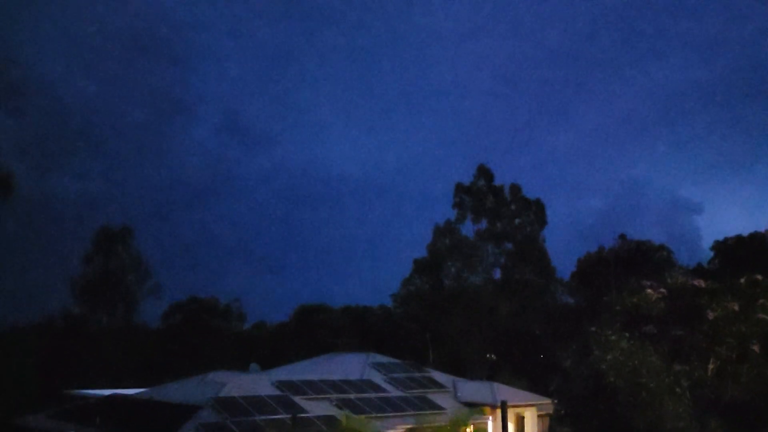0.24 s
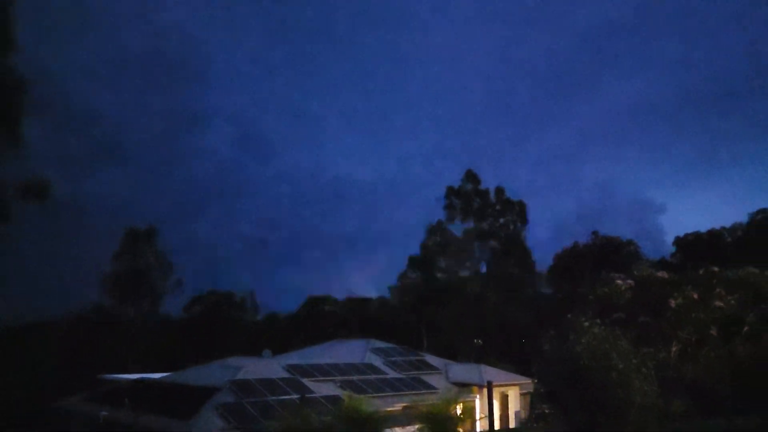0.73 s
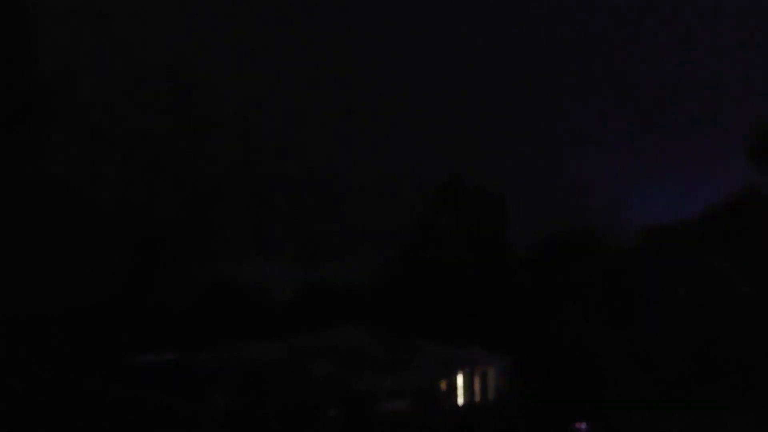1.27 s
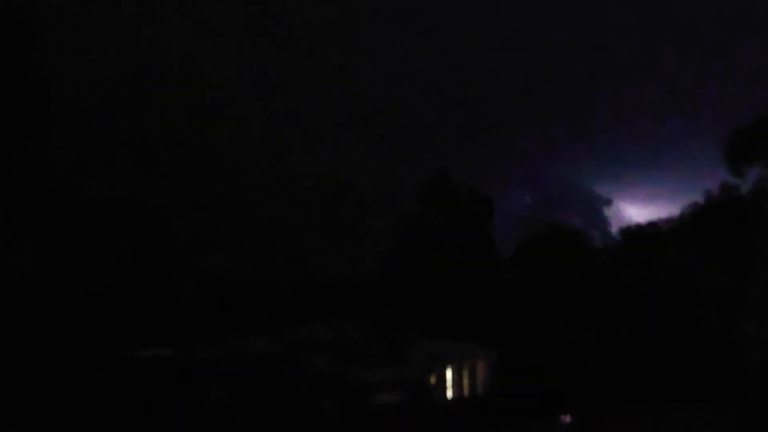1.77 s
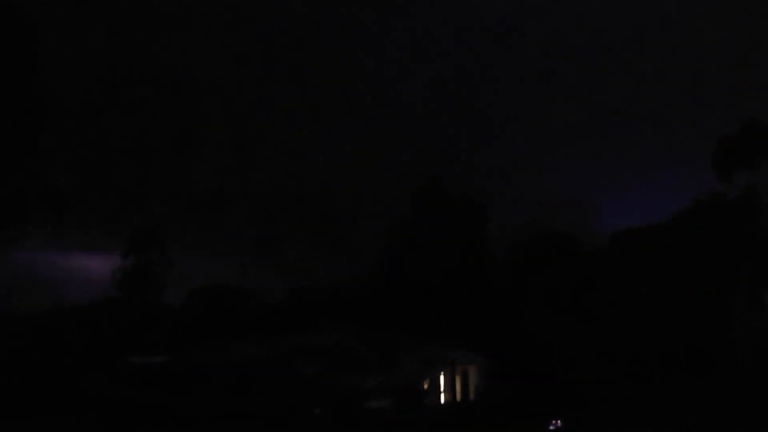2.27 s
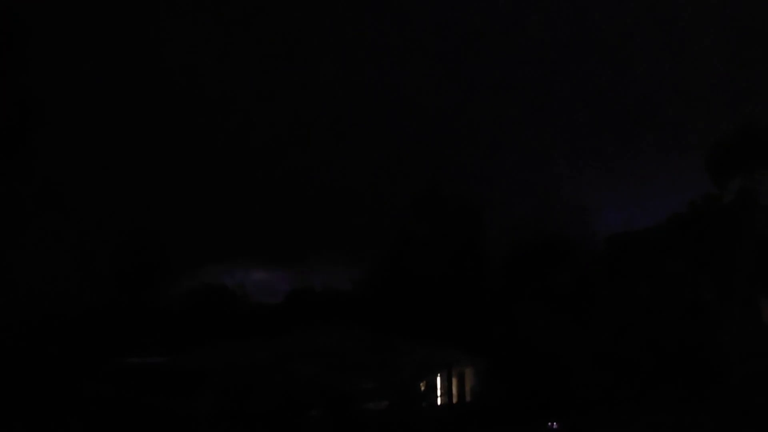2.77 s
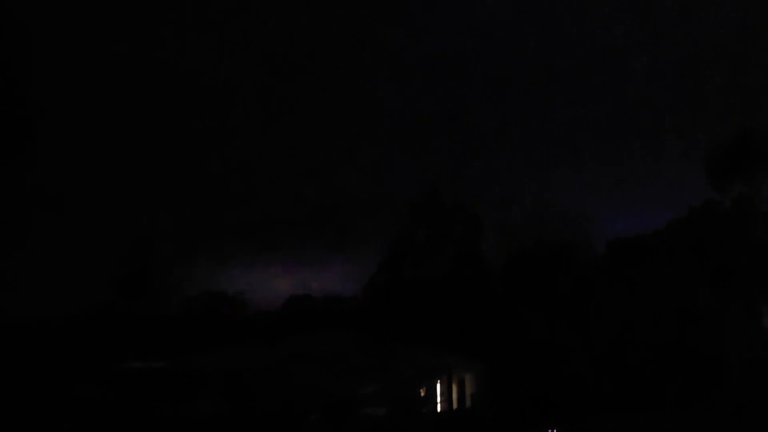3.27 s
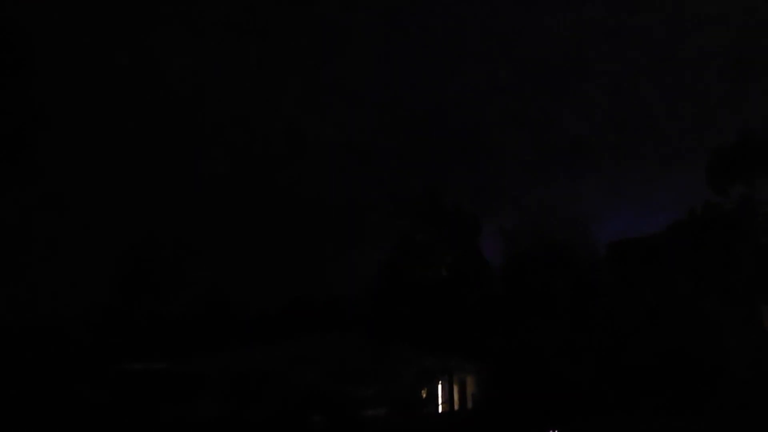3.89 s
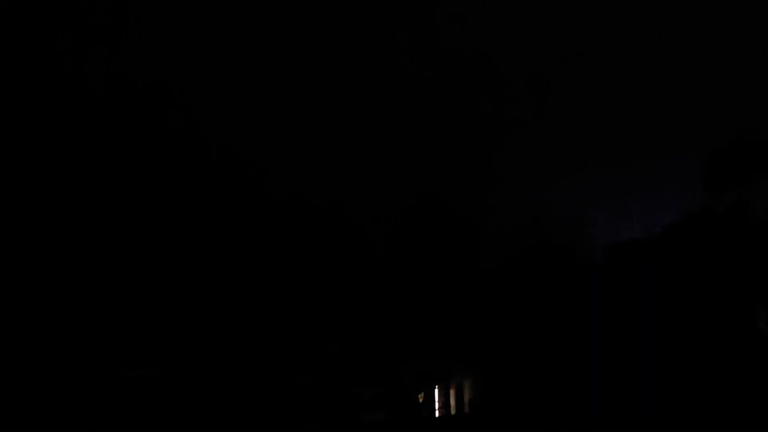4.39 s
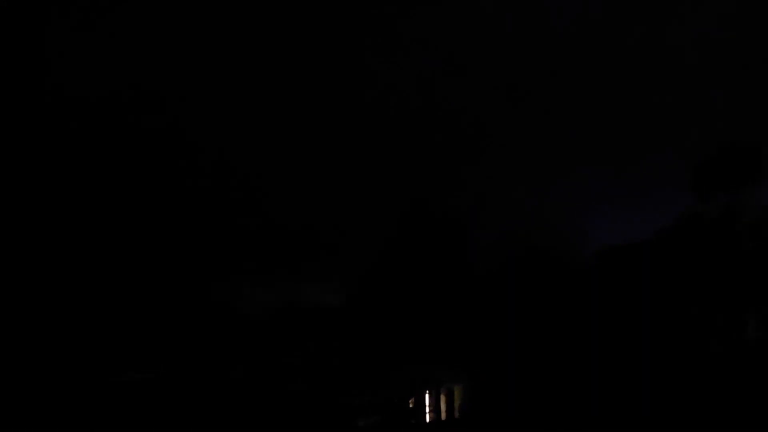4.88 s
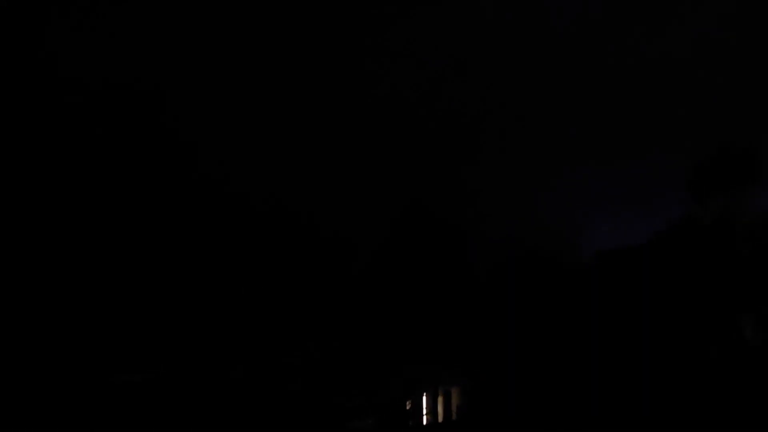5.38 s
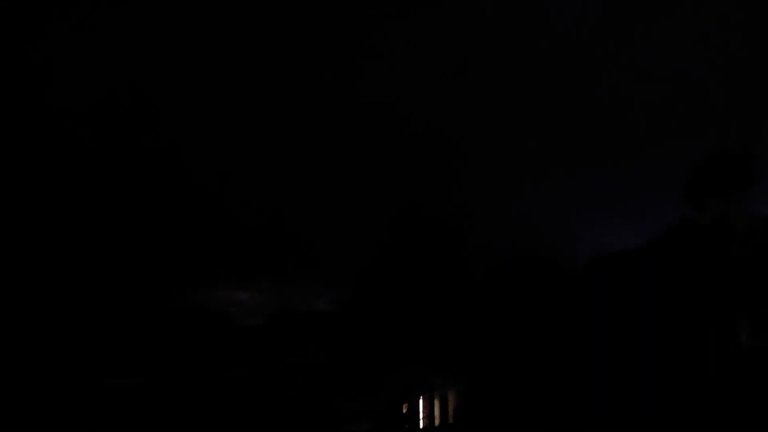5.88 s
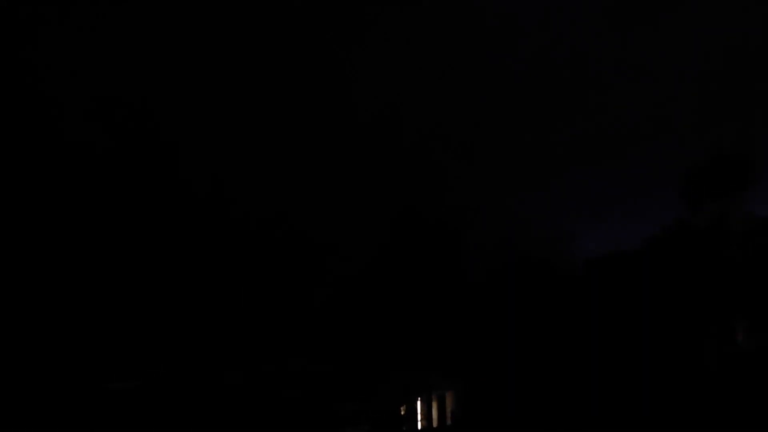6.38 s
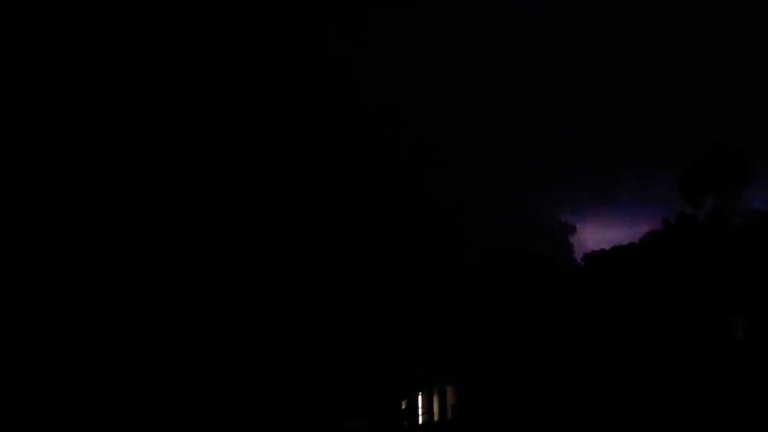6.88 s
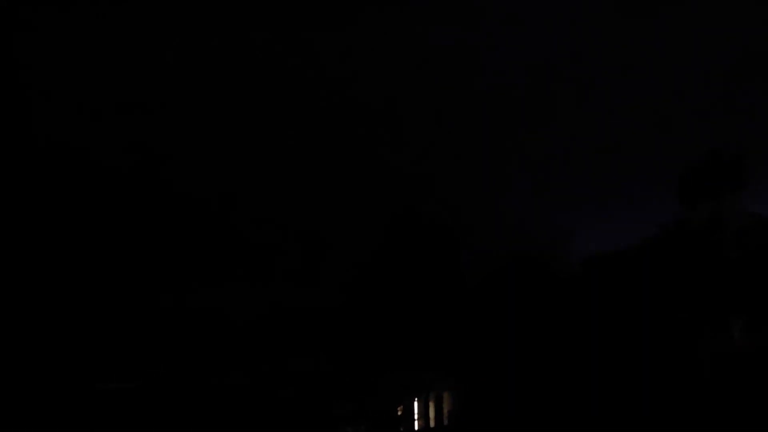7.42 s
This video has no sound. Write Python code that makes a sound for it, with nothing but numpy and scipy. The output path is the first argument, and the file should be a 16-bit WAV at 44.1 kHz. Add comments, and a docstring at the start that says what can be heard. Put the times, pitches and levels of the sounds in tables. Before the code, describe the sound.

Crickets trill steadily close by in a night garden, over soft low wind rumble, with a dull wooden double knock.

```python
"""A garden at night: three crickets trill close by, and more sing farther off.
Each chirp is one wing scraping over a row of tiny teeth on the other. A bush cricket buzzes twice,
distant frogs purr, a far bird calls faintly, and small insects hiss in the grass over a low hum.
Wind rumbles on a hand-held microphone; there are dull knocks, light rustles and one dry snap."""
import sys
import numpy as np
from scipy import signal
from scipy.fft import rfft, irfft, next_fast_len
from scipy.io import wavfile
from scipy.ndimage import map_coordinates

SR = 44100
rng = np.random.default_rng(int(sys.argv[2]) if len(sys.argv) > 2 else 0)


def to_wav(s):
    """Save 16-bit WAV."""
    ch = np.atleast_2d(s).T  # columns
    pcm = np.round(np.clip(ch, -1, 1) * 32767)  # PCM
    wavfile.write(sys.argv[1], SR, pcm.astype(np.int16))


N = 337365
TIME = np.arange(N) / SR


def close_crickets():
    """Three crickets, each at its own tempo and in its own direction, with the garden's echo."""
    # runs of wing strokes, one table per cricket: first_s, last_s, stroke_count, level_db
    near_runs = [(0.055, 0.660, 10, -31), (0.726, 1.522, 13, -31), (1.596, 2.063, 8, -31),
                 (2.129, 3.056, 15, -31.5), (3.124, 4.255, 18, -31.5), (4.321, 4.792, 8, -31.5),
                 (4.869, 6.138, 20, -32), (6.203, 7.194, 16, -32.4), (7.262, 7.597, 6, -32.5)]  # the nearest, on the left
    right_runs = [(0.072, 0.756, 11, -35.8), (0.825, 1.387, 9, -34), (1.453, 1.923, 8, -33.5),
                  (1.992, 2.404, 7, -35.5), (2.476, 3.602, 17, -35.5), (3.758, 4.381, 10, -35),
                  (4.455, 4.740, 5, -31.5), (4.818, 5.165, 6, -34.6), (5.281, 5.502, 4, -33),
                  (5.661, 6.395, 11, -34.5), (6.465, 7.030, 9, -36), (7.098, 7.585, 8, -33)]  # higher and slower
    ahead_runs = [(0.057, 0.320, 5, -38), (0.924, 1.122, 4, -59), (1.399, 2.001, 10, -38),
                  (2.535, 3.536, 16, -38.5), (3.597, 4.461, 14, -37.5), (4.795, 5.126, 6, -38),
                  (5.519, 6.225, 12, -39.5), (6.352, 7.060, 12, -38.5), (7.123, 7.640, 9, -36.5)]  # fainter, often resting
    near = cricket(trill(near_runs, uneven_db=0.8), pitch_hz=4187.4, fall_hz=534, length_s=0.0175,
                   right_db=-2.5, lead_ms=0.29, beam_db=3, wing_db=-2.5, skip_db=-24, sag_hz_per_s=8.3)
    right = cricket(trill(right_runs, uneven_db=1.7), pitch_hz=4480, fall_hz=670, length_s=0.0165,
                    right_db=-12, lead_ms=0.328, beam_db=2, wing_db=-1, skip_db=-28)[::-1]  # swap ears
    ahead = cricket(trill(ahead_runs, uneven_db=1.5), pitch_hz=4120, fall_hz=174, length_s=0.015,
                    right_db=-5.5, lead_ms=-0.004, beam_db=4.5, wing_db=4.5, skip_db=-11, skip_at=0.17)
    direct = near + right + ahead
    ground = gain_of(-20) * echo(direct, fade_s=0.04, first_s=0.003)
    garden = gain_of(-18) * echo(direct, fade_s=0.063, first_s=0.005)
    return direct + ground + garden


def trill(runs, uneven_db, jitter_s=0.0006):
    """Evenly spaced wing strokes (time_s, level_db), each a little off in time and strength."""
    strokes = np.array([(s, db) for first, last, count, db in runs
                        for s in np.linspace(first, last, count)])
    return strokes + rng.standard_normal(strokes.shape) * [jitter_s, uneven_db]


def cricket(strokes, pitch_hz, fall_hz, length_s, right_db, lead_ms, beam_db,
            wing_db=0, skip_db=-26, skip_at=0.68, sag_hz_per_s=0):
    """Each stroke drags a scraper over a row of teeth; it slows, so the wing's tone falls."""
    # the wing's overtones: pitch_multiple, level_db
    overtones = [(2, -23.5), (3, -42)]
    rasp_db, catch_db, flutter, jitter_hz, skew = -33, -22, 0.11, 17, 0.74
    t = np.arange(0, length_s, 1 / SR)
    progress = t / length_s
    swell = np.sin(np.pi * progress ** skew) ** 1.1 * (1 - np.exp(-(t / 0.0005) ** 2))
    overtone_swell = np.sqrt(np.sin(np.pi * progress))  # lasts to the very end of the stroke
    crest = 0.5 ** (1 / skew)  # how far along the stroke is loudest
    glide_hz = fall_hz * ((progress - crest) + 0.22 * (progress - crest) ** 2)
    tone, treble, friction = np.zeros((3, N))
    for time_s, level_db in strokes:
        start_s, size = time_s - crest * length_s, gain_of(level_db)
        teeth_per_s = pitch_hz - sag_hz_per_s * time_s - glide_hz + jitter_hz * wander(t, 560)
        phase = 2 * np.pi * np.cumsum(teeth_per_s) / SR
        add(tone, start_s, size * swell * (1 + flutter * wander(t, 750)) * np.sin(phase))
        upper_tones = sum(gain_of(db) * np.sin(multiple * phase) for multiple, db in overtones)
        flicker = gain_of(wing_db + 3.45 * wander(t, 158))
        add(treble, start_s, size * overtone_swell * flicker * upper_tones)
        # the scraper ticks as it catches, and may skip a tooth part way along
        catch = gain_of(catch_db) * np.exp(-t / 0.00073)
        skip = gain_of(skip_db) * rng.random() * np.exp(-abs(t - skip_at * length_s) / 0.0014)
        add(friction, start_s, size * (gain_of(rasp_db) * swell + catch + skip))
    # the lower overtone flares as it glides through a pitch at which the wing rings
    treble = gain_of(-0.5) * treble + gain_of(1.5) * ringing(treble, hz=8323, width_hz=270)
    scrape_colour = [(3500, -28), (5400, -1.5), (6200, 1.5), (7000, -5), (8500, 2), (10500, -24),
                     (15000, -11)]
    treble += friction * unit_level(coloured(rng.standard_normal(N), scrape_colour))
    # the treble travels in a beam, so it has its own left-right balance
    return placed(tone, right_db, lead_ms) + placed(treble, right_db + beam_db, lead_ms)


def far_crickets(count=4):
    """More crickets, each with its own pitch and tempo, blurred by distance."""
    chorus = np.zeros((2, N))
    for pitch_hz in np.linspace(4130, 4650, count):
        jitter, levels_db = rng.standard_normal((2, 122))
        gaps_s = rng.uniform(0.064, 0.073) + 0.0012 * jitter
        times_s = np.cumsum(gaps_s) - rng.uniform(0.07, 0.14)
        song = cricket(zip(times_s, levels_db), pitch_hz, fall_hz=336, length_s=0.016,
                       right_db=2, lead_ms=rng.uniform(-0.397, 0.426), beam_db=10)
        chorus += song + gain_of(-0.5) * echo(song, fade_s=0.1, first_s=0.0015)
    return gain_of([[-55.5], [-53.5]]) * unit_level(chorus)


def wind(eddies_per_s=9):
    """Gusts buffet the microphones, the right one more, over a low rush; eddies make both lumpy."""
    # how the wind rises and falls: time_s, buffet_db, rush_db
    gusts = [(0.0, -52, -60), (0.25, -52.5, -50), (0.3, -43, -45), (0.51, -52, -55.5), (0.58, -47, -44),
             (0.77, -44.5, -48.5), (1.36, -54.5, -57.5), (1.45, -51, -52.5), (3.13, -67, -53.5),
             (3.19, -57.5, -53.5), (5.03, -60, -52.5), (5.11, -59, -49.5), (5.3, -56, -57),
             (5.37, -42.5, -47), (5.69, -53.5, -55.5), (6.18, -54.5, -54), (6.31, -56.5, -60),
             (6.65, -40, -47.5), (6.8, -59, -54), (6.86, -45, -38), (6.95, -56, -50.5), (7.01, -43.5, -40),
             (7.22, -47, -50), (7.37, -43, -37.5), (7.59, -51, -52), (7.65, -52, -49)]
    # the tone colour of its two parts: pitch_hz, level_db
    buffet_colour = [(10, -25), (22, -17.5), (35, -4.5), (45, -7), (62, -1.5), (80, -18.5), (140, -57),
                     (400, -97)]
    rush_colour = [(30, -10), (55, -9.5), (76, 0), (100, -2), (118, -6.5), (138, -11), (165, -14),
                   (210, -21), (300, -33.5), (900, -57.5)]
    times_s, buffet_db, rush_db = np.transpose(gusts)
    buffet = gain_of(np.interp(TIME, times_s, buffet_db) + 2.94 + 2.5 * wander(TIME, eddies_per_s))
    buffet = buffet * noise(buffet_colour, likeness=0.83)
    rush = gain_of(np.interp(TIME, times_s, rush_db) + 2.36 + wander(TIME, eddies_per_s))
    rush = rush * noise(rush_colour, likeness=0.86)
    return gain_of([[-4.5], [2]]) * buffet + gain_of([[-4], [2.5]]) * rush


def knocks():
    """Soft blows make something wooden ring, with a short echo from the house."""
    # the blows: start_s, level_db, brightness_db_per_octave
    blows = [(0.2325, -44.5, 4.5), (0.3207, -41, -5.5), (0.6113, -49, 10), (1.8852, -52, 5),
             (3.209, -41, -4.5), (3.232, -52, -3), (4.5227, -49.5, 8), (5.1063, -24, -0.5),
             (5.1451, -30, -1.5), (5.3726, -42, 4.5), (6.786, -47.5, 7)]
    # the tones the wood rings with: pitch_hz, level_db, fade_s (time to drop 60 dB)
    wood_tones = [(148, 1, 0.062), (201, -2, 0.026), (280, -6, 0.056), (354, -8, 0.086), (427, -5, 0.094),
                  (465, 1.5, 0.023), (578, -3, 0.045), (647, 0.5, 0.037), (723, -16, 0.076),
                  (875, 0.5, 0.028), (1070, -12.5, 0.066), (1336, -1.5, 0.019)]
    t, direct = np.arange(SR // 4) / SR, np.zeros(N)
    soft_start = 1 - np.exp(-t / 0.001)
    for start_s, level_db, brightness in blows:
        ring = np.zeros(len(t))
        for k, (hz, tone_db, fade_s) in enumerate(wood_tones):
            size = gain_of(tone_db + brightness * np.log2(hz / 500))
            sign = (-1) ** (k // 3)
            ring += sign * size * gain_of(-60 * t / fade_s) * np.sin(2 * np.pi * hz * t)
        ring *= soft_start
        add(direct, start_s, gain_of(level_db) * ring / abs(ring).max())
    wall = echo(direct, fade_s=0.23, first_s=0.0024)
    return placed(direct + gain_of(-1) * wall[0], right_db=3, lead_ms=0.31) + gain_of(-12) * wall


def rustles(grain_db=3, boost_db=5.5):
    """Skin and cloth slide near the microphone in short grainy brushes."""
    # the brushes: middle_s, length_s, level_db (before the boost), low_edge_hz
    brushes = [(0.105, 0.05, -60, 2580), (1.07, 0.035, -59, 6000), (2.096, 0.034, -58, 6000),
               (2.149, 0.31, -65, 6000), (3.608, 0.053, -59.5, 5900), (3.75, 0.052, -54, 5740),
               (3.787, 0.039, -62.5, 2000), (4.074, 0.18, -68, 6000), (4.385, 0.16, -62.5, 5000),
               (4.782, 0.092, -54.5, 3900), (4.804, 0.068, -62.5, 800), (4.85, 0.045, -54, 4470),
               (5.215, 0.052, -60, 7000), (5.518, .12, -52.5, 4250), (5.535, 0.096, -66, 1500),
               (6.175, 0.063, -60.5, 3000), (6.771, 0.084, -63, 2920), (7.02, 0.061, -52, 6100),
               (7.446, 0.033, -58, 3480), (7.588, 0.018, -52.5, 5530)]
    # their tone colour: pitch_hz, level_db
    brush_colour = [(1000, 14), (2500, 2), (4000, 2.5), (6500, 1), (8500, 1.5), (10500, -10), (13000, -7.5),
                    (16000, -5.5)]
    out = np.zeros((2, N))
    for middle_s, length_s, level_db, low_edge_hz in brushes:
        t = np.arange(0, length_s, 1 / SR)
        grains = rng.standard_normal((2, SR))[:, :len(t)] * gain_of(grain_db * wander(t, 408))
        low_cut = signal.butter(2, low_edge_hz, "high", fs=SR)
        brush = unit_level(signal.lfilter(*low_cut, coloured(grains, brush_colour)))
        swell = gain_of(level_db + boost_db) * np.sin(np.pi * t / length_s)
        add(out, middle_s - length_s / 2, swell * brush)
    return out


def dry_snap(start_s=2.027):
    """One tiny burst of noise, like a twig snapping."""
    t, burst = np.arange(SR // 50) / SR, np.zeros(N)
    add(burst, start_s, gain_of(-37) * rng.standard_normal(len(t)) * np.exp(-t / 0.002))
    snap = coloured(burst, [(400, -2), (1200, 7), (2600, 7), (3600, 2), (6000, -14)])
    return placed(snap, right_db=-2, lead_ms=0.2) + gain_of(-6) * echo(snap, fade_s=0.08, first_s=0.003)


def bush_cricket(grain_db=2):
    """Its scraper runs too fast to count: a grainy high buzz that swells and fades."""
    # the buzzes: middle_s, length_s, level_db
    buzzes = [(1.812, 0.61, -60.5), (3.42, 0.76, -60.5)]
    swell = np.zeros(N)
    for middle_s, length_s, level_db in buzzes:
        t = np.arange(0, length_s, 1 / SR)
        add(swell, middle_s - length_s / 2, gain_of(level_db) * np.sin(np.pi * t / length_s))
    buzz = noise([(6500, -60), (7500, -6), (8300, 1), (9000, -7), (10000, -21), (11000, -42)],
                 likeness=0.2)
    return swell * gain_of(grain_db * wander(TIME, 120)) * buzz


def frogs(pitch_hz=2120, spread_hz=85, length_s=0.021, calls_per_s=12, count=16):
    """A distant pond: many short notes near one pitch merge into a purr."""
    t, chorus = np.arange(0, length_s, 1 / SR), np.zeros(N)
    for offset in np.linspace(-2, 2, count):
        note = np.sin(np.pi * t / length_s) * np.sin(2 * np.pi * (pitch_hz + spread_hz * offset) * t)
        calls = (rng.random(N) < calls_per_s / SR).astype(float)
        chorus += np.exp(-0.5 * offset ** 2) * signal.oaconvolve(calls, note)[:N]
    purr = placed(chorus, right_db=-1, lead_ms=0.34)
    purr += gain_of(-8) * echo(chorus, fade_s=0.2, first_s=0.0064)
    murmur = noise([(1200, -39), (1650, -6.5), (1900, -4), (2150, -3), (2350, -12), (2600, -66)],
                   likeness=0.85, lead_ms=0.42)
    return gain_of(-66) * unit_level(purr) + gain_of(-67.5) * murmur


def night_bird():
    """A far bird gives three faint gliding whistles and a long low hoot, with an echo."""
    # the calls: start_s, length_s, first_hz, last_hz, level_db
    calls = [(1.14, 0.087, 1430, 1600, -69), (1.367, 0.062, 1650, 1590, -65),
             (1.673, 0.031, 1180, 1256, -62), (2.623, 0.74, 716, 727, -80)]
    song = np.zeros(N)
    for start_s, length_s, first_hz, last_hz, level_db in calls:
        progress = np.arange(0, length_s, 1 / SR) / length_s
        phase = 2 * np.pi * np.cumsum(first_hz + (last_hz - first_hz) * progress) / SR
        add(song, start_s, gain_of(level_db) * np.sin(np.pi * progress) * np.sin(phase))
    return song + gain_of(-5) * echo(song, fade_s=0.39, first_s=0.0064)


def insect_hiss(start_db=-57, end_db=-54):
    """Small insects merge into a hiss that wavers and slowly grows."""
    # its tone colour: pitch_hz, level_db
    hiss_colour = [(3200, -15), (4300, 12.5), (4950, -5.5), (5350, 3), (5850, -10), (6800, -3.5), (7600, 1),
                   (8300, 2), (8900, -4.5), (9700, -20), (11500, -20)]
    level_db = np.linspace(start_db, end_db, N) + 0.4 * wander(TIME, 3.36) + 0.88 * wander(TIME, 30)
    return gain_of(level_db) * noise(hiss_colour, likeness=0.1)


def far_hum(pitch_hz=131):
    """A faint low tone that wavers in pitch and strength."""
    # its slow rise and fall: time_s, level_db
    hum_levels = [(0, -61), (1.5, -59.5), (2.5, -57), (3.1, -55.5), (4.8, -54.5), (5.6, -59), (6.3, -53.5),
                  (7.65, -59)]
    phase = 2 * np.pi * np.cumsum(pitch_hz + 1.743 * wander(TIME, 12)) / SR
    level_db = np.interp(TIME, *np.transpose(hum_levels)) + 3.5 * wander(TIME, 9)
    return placed(gain_of(level_db) * np.sin(phase), right_db=-1.5, lead_ms=0.076)


def far_air():
    """A soft, unsteady wash of noise from far away."""
    # its tone colour: pitch_hz, level_db
    air_colour = [(100, -1), (300, 2), (420, -0.5), (560, -3), (720, 2), (950, -9), (1400, -8),
                  (2600, -15.5), (3200, -11.5), (6000, -3), (10500, -35), (13000, -15.5), (16000, -22.5)]
    return noise(air_colour, likeness=0.5, lead_ms=0.4) * gain_of(-61.5 + 1.86 * wander(TIME, 7))


def echo(x, fade_s, first_s):
    """Ground, walls and leaves scatter sound: each ear gets a tail that drops 60 dB in fade_s."""
    t = np.arange(SR // 2) / SR
    fade_in = np.clip(t / first_s - 1, 0, 1)
    tail = rng.standard_normal((2, len(t))) * gain_of(-60 * t / fade_s) * fade_in
    return signal.oaconvolve(np.atleast_2d(x), tail / np.linalg.norm(tail[0]), axes=1)[:, :N]


def placed(x, right_db, lead_ms):
    """A sound at two ears: the right one hears it right_db louder and lead_ms later."""
    size = next_fast_len(N)
    delay = np.exp(-2j * np.pi * np.fft.rfftfreq(size, 1000 / SR) * lead_ms)
    return np.array([x, gain_of(right_db) * irfft(rfft(x, size) * delay, size)[:N]])


def noise(colour, likeness, lead_ms=0):
    """Stereo noise; likeness (0 to 1) sets the shared part, which reaches the left ear lead_ms early."""
    shared, separate = rng.standard_normal((2, N))
    left, late = placed(shared, 0, lead_ms)
    right = likeness * late + np.sqrt(1 - likeness ** 2) * separate
    return unit_level(coloured(np.array([left, right]), colour))


def coloured(x, colour):
    """Turns pitches up or down along a curve of (pitch_hz, level_db) points."""
    size = next_fast_len(x.shape[-1])
    hz, db = np.transpose(colour)
    curve_db = np.interp(np.log(np.fft.rfftfreq(size, 1 / SR) + 1), np.log(hz), db)
    return irfft(rfft(x, size) * gain_of(curve_db), size)[..., :x.shape[-1]]


def ringing(x, hz, width_hz):
    """Keeps a narrow band of pitches around hz."""
    return signal.lfilter(*signal.iirpeak(hz, hz / width_hz, fs=SR), x)


def wander(t, rate):
    """A smooth random wobble of size about 1 that changes rate times a second."""
    knots = rng.standard_normal(512)
    return map_coordinates(knots, [(t - t[0]) * rate], order=2, mode="wrap")


def gain_of(db):
    """Turns decibels into a multiplier."""
    return 10 ** (np.asarray(db) / 20)


def unit_level(x):
    """Scales a sound to an average (rms) level of 1."""
    return x / np.sqrt(np.mean(x ** 2) + 1e-20)


def add(mix, start_s, sound):
    """Mixes a sound in at start_s, cutting off what does not fit."""
    start = int(round(start_s * SR))
    sound = sound[..., max(-start, 0):]
    part = mix[..., max(start, 0):][..., :sound.shape[-1]]
    part += sound[..., :part.shape[-1]]


def scene():
    """The whole garden at the two microphones."""
    animals = close_crickets() + far_crickets() + bush_cricket() + frogs() + night_bird()
    background = far_air() + far_hum() + insect_hiss()
    return animals + background + wind() + knocks() + dry_snap() + rustles()


def record(dry):
    """The right microphone is shaded and dull; both lose the very highest treble."""
    # what the shade does to the right side: pitch_hz, change_db
    right_shade = [(50, -2), (1000, -4), (2200, -1), (3000, -4), (4000, 1.5), (4800, -3), (6500, -3),
                   (8300, -9), (11500, -13.5), (16000, -13)]
    top_hz = 15760
    microphones = np.array([dry[0], coloured(dry[1], right_shade)])
    high_cut = signal.firwin(801, top_hz, window=("kaiser", 9), fs=SR)
    return signal.oaconvolve(microphones, high_cut[None], "same")


dry = scene()
out = record(dry)
to_wav(out)
```